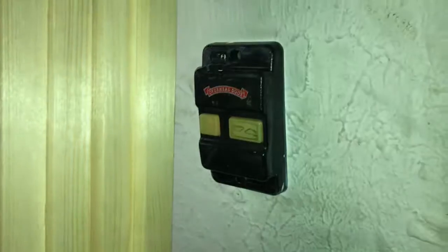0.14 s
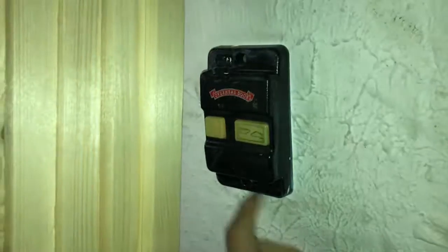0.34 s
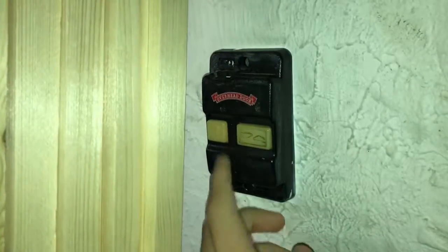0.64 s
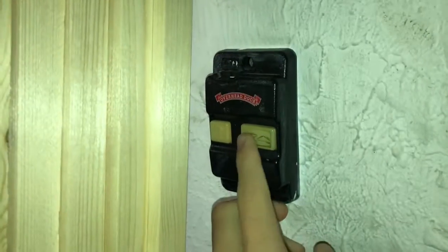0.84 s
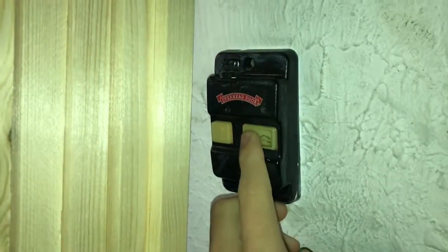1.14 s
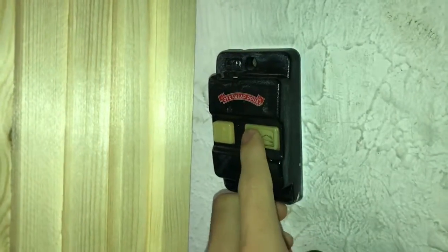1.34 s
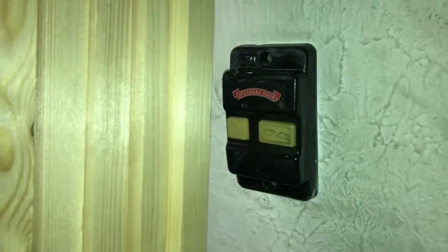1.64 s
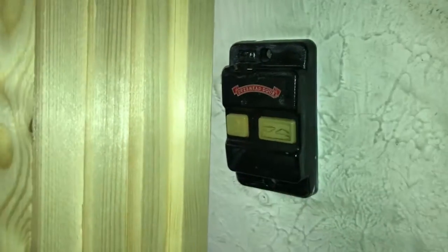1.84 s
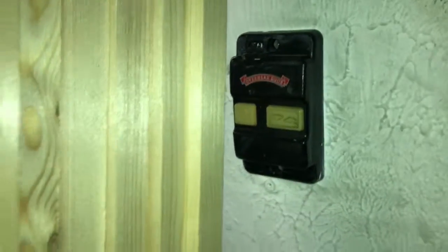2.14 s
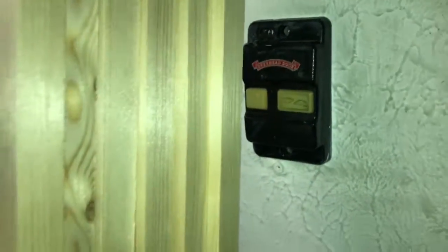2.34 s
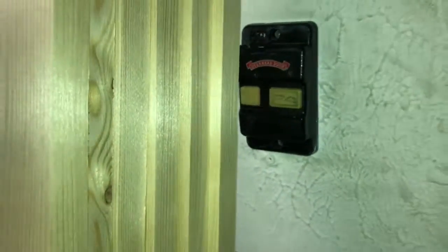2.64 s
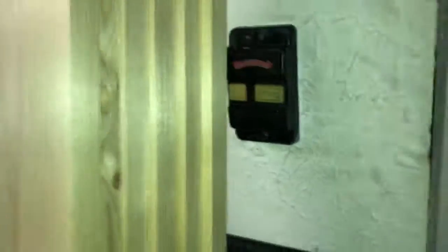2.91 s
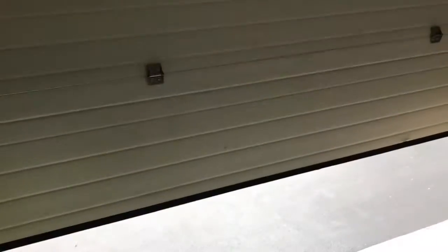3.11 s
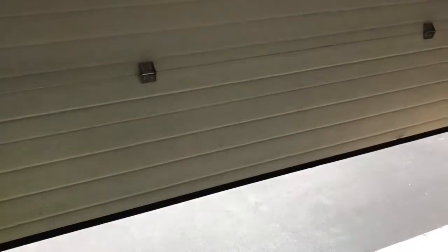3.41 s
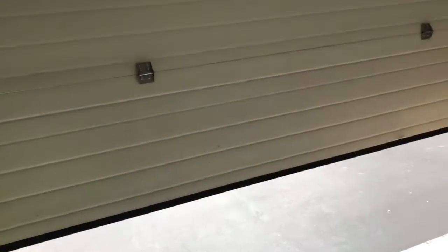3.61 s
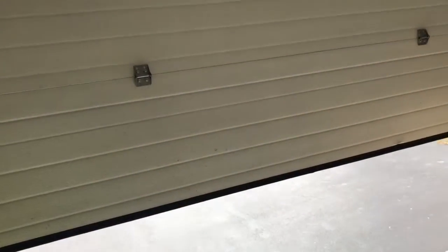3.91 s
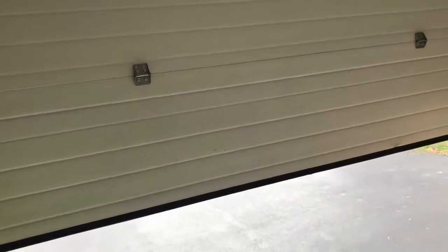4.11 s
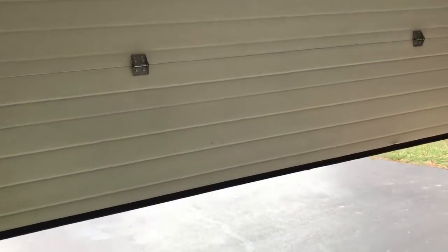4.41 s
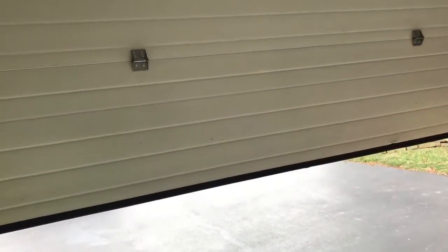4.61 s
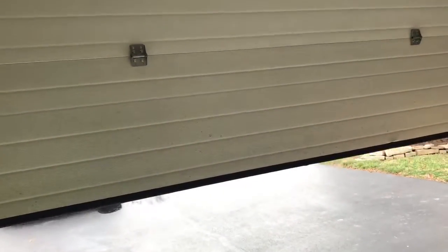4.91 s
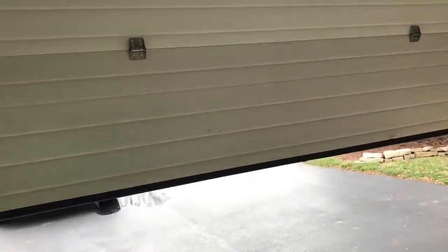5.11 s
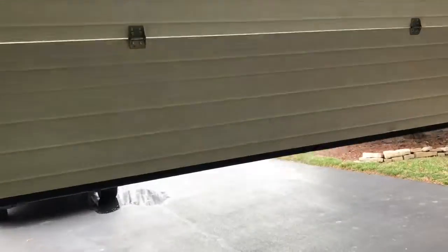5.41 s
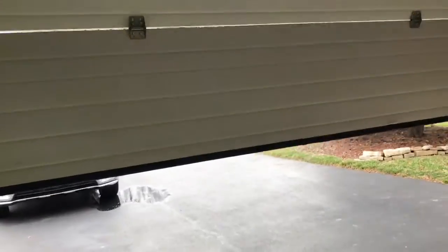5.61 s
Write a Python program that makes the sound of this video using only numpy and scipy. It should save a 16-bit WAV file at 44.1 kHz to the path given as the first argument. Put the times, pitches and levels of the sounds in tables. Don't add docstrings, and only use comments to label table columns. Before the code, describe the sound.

In a reverberant garage, quiet air hiss and faint hand rustling lead to one plastic button click. Almost at once the door jolts: dull knocks, bright metallic clanks and a thin ringing rail over a low mains-like motor hum. The hum and panel rumble continue; after a brief dip the view changes and the sound is duller, with scattered rattles. A handheld microphone adds rubs and tiny dry ticks.

```python
import sys
import numpy as np
from scipy import signal
from scipy.fft import rfft, irfft
from scipy.io import wavfile
from scipy.ndimage import uniform_filter1d

SR = 44100
rng = np.random.default_rng(int(sys.argv[2]) if len(sys.argv) > 2 else 0)


def unload_audio(sound):
    columns = np.transpose(np.atleast_2d(sound))
    steps = np.round(np.clip(columns, -1, 1) * 32767)
    wavfile.write(sys.argv[1], SR, steps.astype(np.int16))


def how_loud(loudness_db):
    steps = np.asarray(loudness_db, float) / 20
    return 10 ** steps


N = 253575
JOIN_S = 3.028
HIGH_RISE_S = 0.0035
TRACK_HZ = 5493

# f/Hz, width/Hz, level/dB
PANEL_MODES = [(67.8, 3.9, 12), (151.4, 11, 5.5), (195, 18, 1.5), (324, 53, 8), (527, 44, 4), (577, 61, 7),
               (757, 20, 4.5), (955, 13, 7)]


def evened(x):
    return x / np.sqrt(np.mean(x ** 2) + 1e-20)


def read(points, hz):
    f, value = np.transpose(points)
    return np.interp(np.log(hz + 1), np.log(f + 1), value)


def curves(rows, rest=None):
    s, *columns = np.transpose(rows)
    return [np.interp(np.arange(N) / SR, s, c, left=rest) for c in columns]


def peaks(modes, hz):
    lorentzians = [(how_loud(2 * db) - 1) / (1 + (2 * (hz - f) / w) ** 2) for f, w, db in modes]
    return np.sqrt(1 + sum(lorentzians))


def bell(hz, centre_hz, octaves):
    return np.exp(-.25 * (np.log2(hz / centre_hz + 1e-9) / octaves) ** 2)


def add(mix, s, sound):
    part = mix[round(s * SR):][:len(sound)]
    part += sound[:len(part)]


def coloured(x, gain):
    return evened(irfft(rfft(x) * gain(np.fft.rfftfreq(len(x), 1 / SR)), len(x)))


def flutter(hz, db):
    return how_loud(db * coloured(rng.standard_normal(N), lambda f: 1 / (1 + (f / hz) ** 2)))


def grains(per_s, spread_db, share):
    strength = how_loud(spread_db * np.minimum(rng.exponential(1, N), 3.1))
    struck = rng.random(N) < per_s / SR
    impacts = rng.standard_normal(N) * strength * struck
    share = np.clip(share, 0, 1)
    return np.sqrt(share) * evened(impacts) + np.sqrt(1 - share) * rng.standard_normal(N)


def burst(noise, gain, db, rise, t60):
    t = np.arange(len(noise)) / SR
    shape = how_loud(db - 60 * t / t60) * (1 - np.exp(-(t / rise) ** 1.5))
    sound = shape * coloured(noise, gain)
    return sound * np.linalg.norm(shape) / np.linalg.norm(sound)


def strokes(rows, rest_db, sharp):
    t = np.arange(N) / SR
    power = how_loud(2 * rest_db)
    for s, length, db in rows:
        arch = abs(np.sin(np.pi * np.clip((t - s) / length, 0, 1)))
        power = power + how_loud(2 * db) * arch ** sharp
    return np.sqrt(power)


def air():
    # f/Hz, level/dB
    air_spectrum = [(26, -40), (45, 11.5), (83, -1), (170, -7.5), (706, -17.5), (798, -15), (925, -18),
                    (996, -19), (3080, -24), (13100, -28.5), (16000, -23.5)]
    return how_loud(-63.5) * coloured(rng.standard_normal(N), lambda f: how_loud(read(air_spectrum, f)))


def hand():
    # f/Hz, level/dB
    rub_spectrum = [(1760, -39), (3000, -7), (3670, -9), (4480, -6.5), (6340, -7), (8020, -5), (8900, -2),
                    (11000, 1.5), (12500, 2), (15700, -10.5)]
    sleeve_spectrum = [(60, -25), (150, -0.5), (400, -6.5), (1200, -10.5), (2500, -19.5), (5000, -26),
                       (8000, -39)]
    wobble_spectrum = [(8, -5), (18, 3), (30, -6), (45, -10), (65, -18), (200, -89)]
    # start t/s, length/s, level/dB
    rub_moves = [(.25, 0.29, -63.5), (.64, 0.064, -70), (1.17, .07, -71), (1.38, 1.45, -56.5),
                 (1.62, 0.23, -46.5), (2.17, 0.22, -50), (2.6, 0.31, -62), (3.0, .18, -42.5),
                 (3.18, 0.44, -55), (3.42, 0.46, -50.5), (3.75, 0.57, -62.5), (4.15, 0.39, -60),
                 (4.5, 0.24, -76), (4.88, 0.26, -59), (5.25, 0.75, -67.5)]
    # start t/s, length/s, level/dB
    shake_moves = [(0, 0.16, -65), (.42, 0.12, -63), (1.22, 0.14, -64), (4.6, 0.24, -55),
                   (.22, 0.69, -65.5), (.95, 0.22, -75), (1.3, 0.83, -42), (2.15, 0.82, -47),
                   (2.85, 0.46, -54), (3.42, .9, -61), (4.28, 0.17, -51), (4.4, 1.3, -58)]
    # start t/s, length/s, level/dB
    sleeve_moves = [
        (.09, 0.14, -60),
        (.2, 0.39, -56.5),
        (.56, 0.11, -62),
        (1.245, .08, -64),
    ]
    rustle = coloured(grains(1200, 2.5, .2), lambda f: how_loud(read(rub_spectrum, f)))
    wobble = coloured(rng.standard_normal(N), lambda f: how_loud(read(wobble_spectrum, f)))
    sleeve = coloured(grains(600, 2.5, 0.15), lambda f: how_loud(read(sleeve_spectrum, f)))
    out = how_loud(-1.7) * strokes(rub_moves, -74.5, sharp=1.96) * rustle * flutter(25, 1.2)
    out = out + how_loud(2.0) * strokes(shake_moves, -83, sharp=3.0) * wobble
    return out + how_loud(-5.0) * strokes(sleeve_moves, -71.5, sharp=2.7) * sleeve


def grip_ticks():
    # t/s, peak level/dB, f/Hz
    tick_events = [(.144, -38, 11800), (.148, -34, 10100), (0.1506, -27, 10500), (0.1569, -32, 9950),
                   (.3296, -45, 10200), (.3754, -44, 11400), (.5546, -47, 12600), (.5656, -51, 10500),
                   (.608, -46, 11800), (.8804, -47, 12800), (2.0976, -32.5, 11450), (2.1217, -39, 11300),
                   (2.063, -41, 11000), (2.146, -41, 11550), (2.247, -35, 11500), (2.354, -35, 11780),
                   (2.3855, -38, 8000), (2.4804, -39, 10000), (2.49, -38, 12500), (2.6, -46, 10000),
                   (2.616, -44, 14000), (2.6394, -38, 12700), (2.848, -51, 9900), (2.8594, -45, 11400),
                   (3.0492, -35, 10700), (3.052, -24, 9960), (3.0894, -23, 12400), (3.244, -34, 12700),
                   (3.2909, -35, 11400), (3.5777, -28, 12500), (3.5864, -31, 12500), (3.805, -43, 12000),
                   (3.835, -44, 11000), (4.0044, -45, 10800), (4.075, -43, 10300), (4.1163, -44, 10800),
                   (4.128, -46, 11000), (4.1648, -28, 10400), (4.191, -33, 9920), (4.2166, -27.5, 10800),
                   (4.227, -41, 12500), (4.2423, -36, 10200), (4.255, -43, 13000), (4.2914, -38, 12500),
                   (4.3523, -26, 11500), (4.3794, -33, 10500), (4.542, -45, 12500), (4.6735, -46, 9500),
                   (4.698, -43, 9500), (4.714, -41, 11500), (4.7494, -31, 11700), (4.767, -36, 13000),
                   (4.8945, -34, 11500), (4.9104, -34, 11500), (4.962, -24, 8500), (4.9625, -28, 14000),
                   (4.978, -28, 12700), (5.2806, -50, 7200), (5.3216, -40, 8000), (5.33, -44, 9000),
                   (5.5595, -51, 8000)]
    out = np.zeros(N)
    for (s, db, hz), fizz in zip(tick_events, rng.standard_normal((len(tick_events), 2048))):
        body = lambda f: bell(f, hz, 0.16) + 0.23 * bell(f, 4940, 0.049) + 0.1
        add(out, s, burst(fizz, body, db - 9.0, rise=0.00033, t60=0.015))
    return out


def button():
    # t/s, level/dB
    snaps = [
        (1.2597, -34.5),
        (1.2635, -47),
        (1.274, -64),
        (1.278, -55),
        (1.296, -66),
    ]
    # f/Hz, level/dB, t60/s
    shell_modes = [(970, -2, 0.021), (1100, -11, 0.03), (1583, -14, .04), (2450, -10, 0.026),
                   (4030, -23, 0.022), (6050, -21, .012)]
    out, t = np.zeros(N), np.arange(3000) / SR
    for k, (s, blow_db) in enumerate(snaps):
        ringing = np.zeros(len(t))
        for j, (hz, db, t60) in enumerate(shell_modes):
            brighter_db = 0.76 * k * j
            ringing += how_loud(blow_db + db + brighter_db - 60 * t / t60) * np.sin(2 * np.pi * hz * t)
        add(out, s, ringing * (1 - np.exp(-t / 0.00055)))
    return out


def knocks():
    # t/s, peak level/dB, f/Hz, t60/s
    joint_knocks = [(1.3, -39.5, 910, 0.12), (1.418, -33, 590, 0.11), (1.456, -44, 600, .15),
                    (1.47, -33.5, 270, 0.32), (1.628, -31, 300, 0.19), (1.491, -30.5, 870, 0.13),
                    (2.096, -52, 1080, 0.12), (2.681, -35, 1000, 0.13), (3.322, -28.5, 1570, 0.28),
                    (2.9, -43, 1580, .15), (3.933, -49, 1700, .1), (4.9, -39, 1800, .1),
                    (4.67, -42, 2300, .2), (4.742, -38, 2200, 0.17), (3.323, -34, 650, .3),
                    (5.41, -36, 960, 0.37), (4.105, -39, 1500, .15), (4.127, -33, 2050, .22),
                    (4.15, -38, 1700, .15), (4.1215, -28, 1250, 0.12), (4.255, -27, 230, .25),
                    (4.262, -34, 750, .2), (1.44, -31, 330, .5), (1.62, -31, 220, .4), (3.5, -36, 185, .5),
                    (1.72, -34, 2400, .25), (4.235, -33, 250, 0.3), (4.28, -21, 190, 0.13),
                    (5.323, -31, 1600, 0.051), (5.401, -25, 1750, 0.1), (5.4, -29.5, 440, 0.26)]
    out = np.zeros(N)
    for (s, db, hz, t60), echo in zip(joint_knocks, rng.standard_normal((len(joint_knocks), 8192))):
        body = lambda f: bell(f, hz, 0.22) + 0.5 * bell(f, 0.6 * hz, 0.82)
        add(out, s, burst(echo, body, db - 10, 1.6 / hz, t60))
    return out


def jolts():
    # t/s, level/dB, t60/s
    jolt_events = [(1.41, -44, .9), (1.49, -40, 0.94), (1.59, -37, 0.59), (1.66, -45, 0.47),
                   (2.16, -43, 0.76), (2.39, -45.5, 0.76), (2.64, -45.5, 1.5), (2.89, -40, 0.39),
                   (3.2, -50, .9), (3.6, -45, 1.6), (3.79, -55, 0.7), (4.185, -37.5, 0.97),
                   (4.245, -34, 0.4), (4.69, -42, 1.3), (4.76, -48, 1.1), (4.93, -38.5, 0.65),
                   (5.06, -43, .5), (5.24, -41.5, .8), (5.39, -42.5, 0.76), (5.62, -46, 0.71)]
    s, db, t60 = np.transpose(jolt_events)[:, :, None]
    since = np.maximum(np.arange(N) / SR - s, 0)
    swell = 1 - np.exp(-since / 0.029)
    return np.linalg.norm(how_loud(db - 60 * since / t60) * swell, axis=0)


def door():
    # t/s, level/dB
    roller_effort = [(1.345, -78), (1.376, -60), (1.43, -41), (1.57, -51), (1.68, -45), (2.0, -52),
                     (2.17, -47.5), (2.42, -51), (2.9, -50), (3.3, -47), (3.8, -50), (4.03, -46.5),
                     (4.36, -46.5), (4.8, -46), (4.97, -53.5), (5.07, -42.5), (5.2, -47.5), (5.71, -49)]
    # f/Hz, level/dB
    panel_spectrum = [(26, -62), (45, -13.5), (86, -4), (119, -1), (151, -1.5), (231, -10), (276, -15.5),
                      (317, -14), (656, -24), (732, -24), (1200, -19.5), (1560, -37), (2640, -120)]
    grind_spectrum = [(300, 1), (700, 8.5), (1100, 1.5), (1700, 0), (2500, -5.5), (3500, -13), (6000, -17),
                      (9000, -21), (16000, -32)]
    effort_db = curves(roller_effort, rest=-99)[0]
    shaken = np.hypot(how_loud(effort_db - 2.0), jolts())
    crowd = how_loud(3.5 * evened(uniform_filter1d(rng.standard_normal(N // 2 + 1), size=150)))

    def panel_gain(f):
        return how_loud(read(panel_spectrum, f)) * peaks(PANEL_MODES, f) / peaks([(111, 29.7, 13.6)], f)

    rumble = coloured(grains(400, 1.2, 0.2), panel_gain)
    grind = coloured(grains(1200, 2.2, 0.15), lambda f: how_loud(read(grind_spectrum, f)) * crowd)
    moving = np.clip((np.arange(N) / SR - 1.35) / .03, 0, 1)
    boom = shaken * rumble * flutter(9.0, 1.22)
    return moving * (boom + how_loud(effort_db - 2.5) * grind * flutter(19, 1.1))


def motor():
    # t/s, pull level/dB
    load = [(1.4, -63), (1.5, -50), (1.72, -46.5), (1.85, -42), (2.3, -42.5), (2.6, -41.5), (3.35, -43),
            (4.0, -42.5), (4.6, -42), (4.83, -45), (4.95, -39), (5.2, -44.5), (5.42, -40), (5.71, -47.5)]
    # multiple of the pull, level under the pull/dB
    orders = [(.5, -15), (2, -22), (4, -22.5), (6, -22.5), (7, -33)]
    t, pull_db = np.arange(N) / SR, curves(load)[0]
    hz = 119.96 * flutter(3.96, 0.024)
    turn = 2 * np.pi * np.cumsum(hz) / SR
    buzz_db = np.where(t < JOIN_S, -56.5 - 6 * (t - 1.23), -55 + 1.64 * (t - JOIN_S))
    buzz = coloured(rng.standard_normal(N), lambda f: 1 / (1 + ((f - 239) / 14) ** 2))
    phase_waver = np.log(flutter(13, 1.2))
    tone = how_loud(pull_db) * flutter(30, 1.2) * np.sin(turn + phase_waver) + how_loud(buzz_db - 2) * buzz
    for k, db in orders:
        tone = tone + how_loud(pull_db + db) * flutter(20, 4.15) * np.sin(k * turn)
    return np.sqrt(2) * tone * np.clip((t - 1.37) / 0.046, 0, 1)


def clanks():
    # t/s, jingle level/dB, panel level/dB, bracket level/dB, t60/s
    blows = [(1.3722, -41.5, -57, -65, 0.92), (1.4181, -42, -42, -49.5, 0.77),
             (1.487, -34, -55, -49.5, 0.63), (1.6152, -22.5, -37.5, -40, 0.47), (1.642, -26, -54, -45, .4),
             (1.716, -27, -47, -39.5, 0.37), (1.8456, -21.5, -37, -40.5, 0.49),
             (1.872, -27, -55, -53, 0.31), (2.1598, -39.5, -42, -52.5, 0.64), (2.2706, -42, -50, -57, 0.46),
             (2.387, -35, -42.5, -55, 0.28), (2.402, -37, -60, -60, 0.22),
             (2.6569, -36.5, -45, -53.5, 0.54), (2.8792, -43.5, -46.5, -57, 0.92),
             (3.3185, -26.5, -34, -48.5, 0.31), (3.652, -42, -42, -62, 0.68),
             (4.2909, -38, -44.5, -62, 0.23), (4.355, -29.5, -51, -50, 0.32),
             (4.382, -36.5, -62, -51, 0.41), (4.4749, -39.5, -60, -58, 0.36),
             (4.697, -40.5, -43, -55, 0.36), (4.7491, -38, -40, -52, 0.49), (4.8941, -37.5, -40, -50, 0.14),
             (4.94, -40, -46, -53, 0.8), (4.9642, -28.5, -44, -45.5, 0.32), (5.3225, -46.5, -65, -54, 0.41),
             (5.399, -37, -37, -68, 0.32), (5.6192, -49.5, -55, -64, 0.98)]
    # f/Hz, width/Hz, level/dB
    steel_modes = [(2460, 60, 5), (2795, 40, 6), (3600, 50, 6), (4250, 80, 6), (4700, 60, 5), (7800, 60, 5),
                   (8330, 50, 5), (9970, 40, 4), (10320, 40, 5), (10610, 40, 5), (11040, 40, 6),
                   (11620, 70, 6), (11970, 40, 4), (12700, 45, 5), (13200, 45, 4)]
    out = np.zeros(N)
    echoes = rng.standard_normal((len(blows), 32768))
    again = signal.lfilter([1], [1, -np.exp(-1 / (.003 * SR))], rng.random(echoes.shape) < 140 / SR)
    echoes = echoes * how_loud(3 * np.minimum(again, 1.5))
    streaks = uniform_filter1d(rng.standard_normal((len(blows), 16385)), size=30, axis=1)
    echoes = irfft(rfft(echoes) * how_loud(3.2 * evened(streaks)))
    woken = rng.uniform(0.1, 1.0, (len(blows), len(steel_modes)))
    lead = .003
    for (s, jingle_db, panel_db, bracket_db, t60), echo, wake in zip(blows, echoes, woken):
        steel = [(f, w, db * r) for (f, w, db), r in zip(steel_modes, wake)]
        jingle_hz = 10900 if s > JOIN_S else 14000
        panel = lambda f: bell(f, 930, 0.65) * peaks(PANEL_MODES, f)
        bracket = lambda f: (bell(f, 2780, 0.32) + bell(f, 2700, 0.68)) * peaks(steel, f)
        jingle = lambda f: bell(f, jingle_hz, 0.42) / (1 + (f / 15300) ** 8) * peaks(steel, f)
        add(out, s, burst(echo, panel, panel_db - 6.0, .007, 1.65 * t60))
        add(out, s - lead, burst(echo, bracket, bracket_db, HIGH_RISE_S, 0.97 * t60))
        add(out, s - lead, burst(echo, jingle, jingle_db - 13.0, HIGH_RISE_S, 0.91 * t60))
    return out


def rings():
    # t/s, f/Hz, width/Hz, level/dB, t60/s
    ringing_parts = [(1.43, 585, 14, -41, 0.62), (1.43, 493, 30, -45, 0.47), (1.63, 686, 56, -45, 0.43),
                     (1.718, 5540, 82, -48, .44), (1.846, 5530, 90, -52, 0.37),
                     (1.618, 11613, 30, -47, 1.3), (1.719, 950, 45, -43.5, 0.3),
                     (1.849, 975, 16, -40.5, 0.15), (1.85, 3310, 200, -42.5, .43),
                     (2.19, 3240, 44, -54.5, .44), (2.39, 518, 27, -46.5, 0.56),
                     (3.32, 640, 11, -46.5, 0.67), (3.36, 2420, 200, -50.5, 0.32),
                     (1.618, 6000, 60, -58, .8), (1.72, 5190, 20, -58, .3), (3.32, 7560, 80, -56, .66),
                     (3.33, 1600, 68, -44, 0.31), (4.163, 4600, 150, -43.5, 0.028),
                     (4.214, 4500, 150, -45, 0.029), (4.292, 5300, 250, -52, .15),
                     (4.359, TRACK_HZ, 150, -54, 0.52), (4.755, 3110, 12, -52, .36),
                     (4.938, 7400, 870, -33.5, 0.031), (5.4, 6240, 50, -60, 0.39),
                     (5.4, 4680, 60, -57, 0.26), (5.403, 8500, 87, -61, 0.35),
                     (4.352, 11550, 90, -49.5, .45), (4.166, 10200, 600, -44, .035),
                     (4.217, 10500, 600, -44, .035), (4.38, 3090, 14, -57, .35), (4.965, 3100, 20, -55, .3),
                     (4.352, 3900, 88, -53, 0.41), (4.75, 11680, 90, -54.5, .4),
                     (4.962, 5200, 250, -45, .1), (2.18, 4280, 40, -55, .4), (2.4, 4080, 60, -59, .4),
                     (2.66, 4230, 60, -55, .4), (4.51, 5540, 40, -62.5, 0.24), (5.165, 4800, 200, -50, .03),
                     (3.32, 11170, 60, -48.5, 0.4), (1.72, 11700, 100, -48, .5),
                     (4.82, 4600, 60, -62.5, 0.25), (4.895, 4000, 80, -54, 0.18)]
    # t/s, level/dB
    hinge_hits = [
        (2.159, -54),
        (2.39, -56),
        (2.66, -55),
        (2.88, -54),
        (4.36, -63),
    ]
    rows = ringing_parts + [(s, 4550, 310, db, 0.43) for s, db in hinge_hits]
    out = np.zeros(N)
    for (s, hz, width, db, t60), echo in zip(rows, rng.standard_normal((len(rows), 32768))):
        resonance = lambda f: (1 + ((f - hz) / width) ** 2) ** -.6
        add(out, s, burst(echo, resonance, db, HIGH_RISE_S, t60))
    return out


def rail():
    # t/s, level/dB
    rail_hits = [
        (1.5, -68),
        (1.618, -50.5),
        (1.719, -51),
        (1.846, -57),
        (2.27, -64),
        (2.391, -65),
        (2.53, -69),
    ]
    out, t = np.zeros(N), np.arange(SR) / SR
    wander = .9 * coloured(rng.standard_normal(N + SR), lambda f: 1 / (1 + (f / 60) ** 2))
    for s, db in rail_hits:
        hz = TRACK_HZ - 74 * (s - 1.75)
        note = np.sin(2 * np.pi * hz * t + wander[round(s * SR):][:SR])
        add(out, s, how_loud(db + 1.5 - 60 * t / .8) * np.minimum(t / 0.0046, 1) * note)
    return out * flutter(45, 2.2)


def scene():
    handling = hand() + grip_ticks()
    steelwork = knocks() + door() + clanks() + rings() + rail()
    return (air() + handling + button() + motor() + steelwork)[None]


def roll_off(x):
    return signal.sosfilt(signal.butter(12, 16490, fs=SR, output="sos"), x)


def record(dry):
    t = np.arange(N) / SR
    fade_in = (t - 0.027) / 0.063
    dip = abs(t - JOIN_S) / 0.04 + 0.0081
    fade_out = (5.74 - t) / 0.027
    faded = dry * np.clip(np.min([fade_in, dip, fade_out], axis=0), 0, 1) ** 1.09
    low_pass = signal.firwin(511, 15900, window=("kaiser", 9), fs=SR)
    limited = signal.oaconvolve(faded, low_pass[None], "same")
    return roll_off(limited)


dry = scene()
out = record(dry)
unload_audio(out)
```